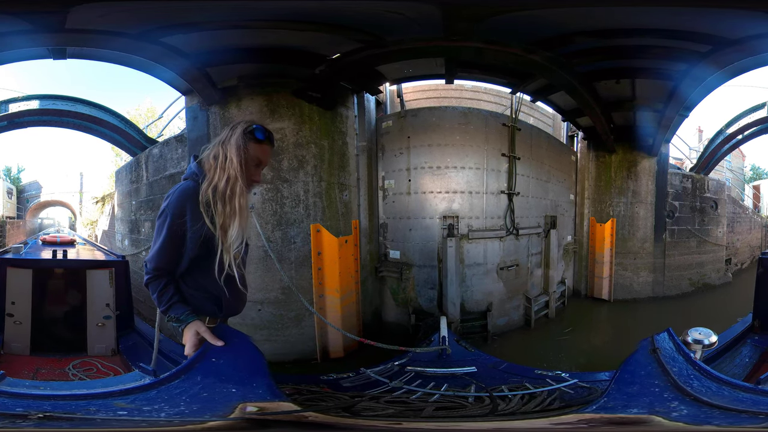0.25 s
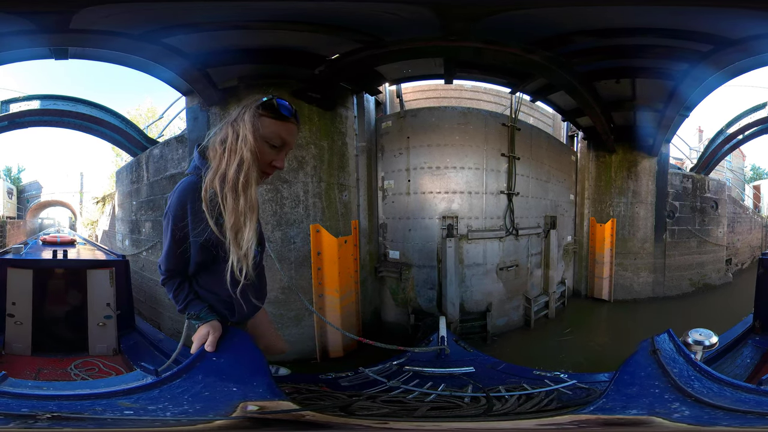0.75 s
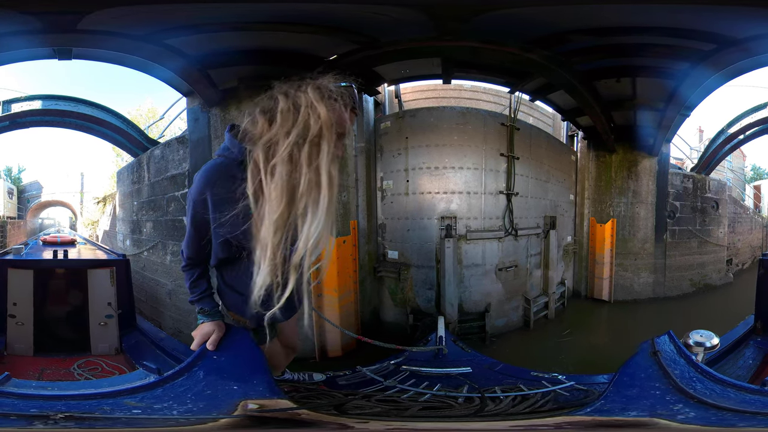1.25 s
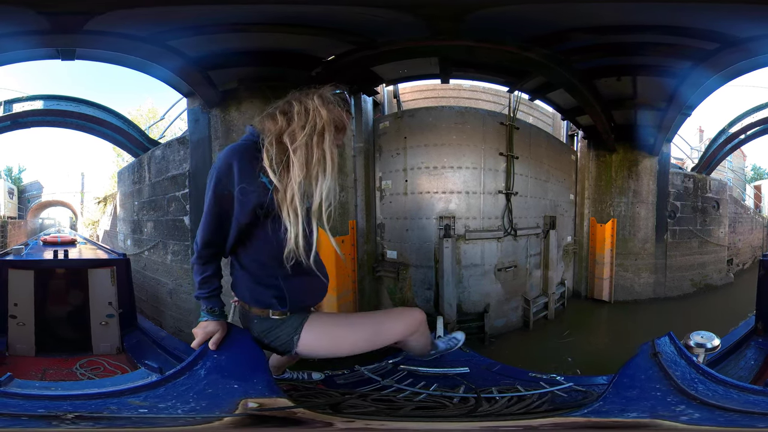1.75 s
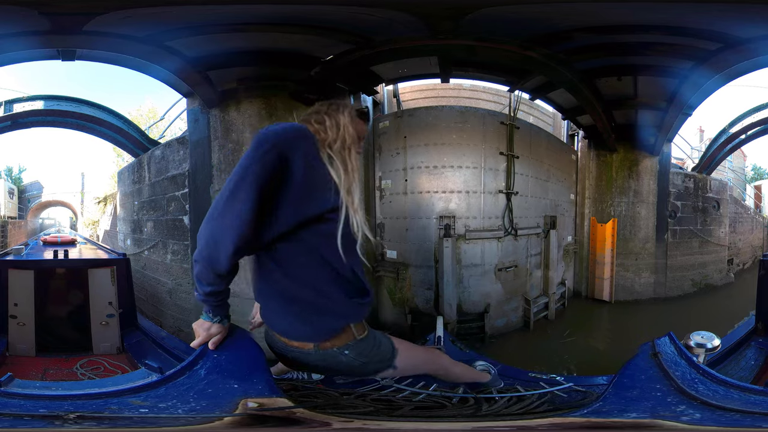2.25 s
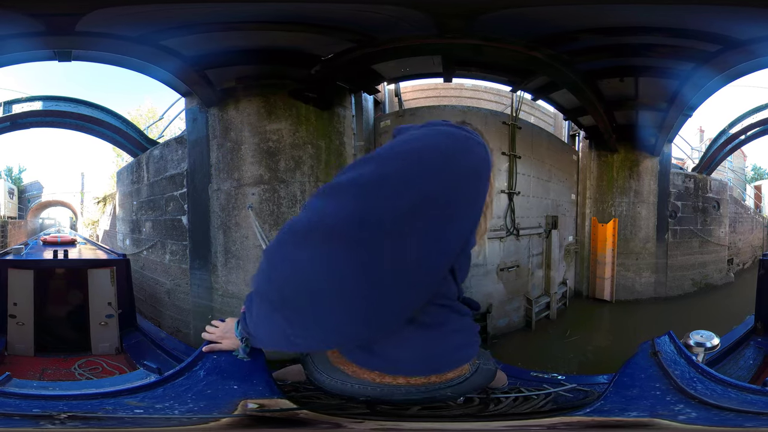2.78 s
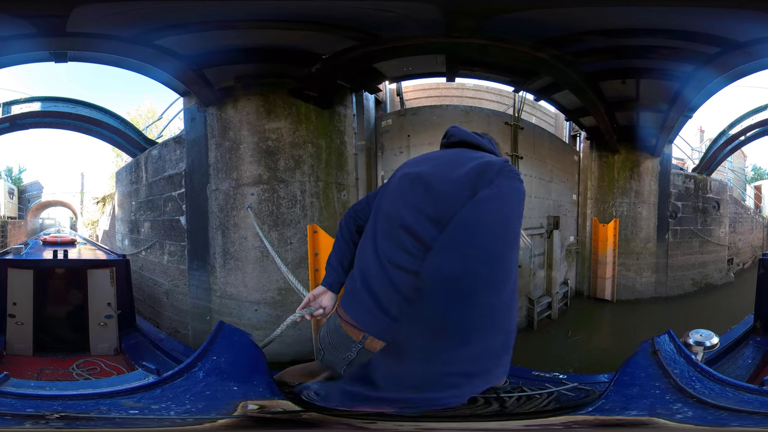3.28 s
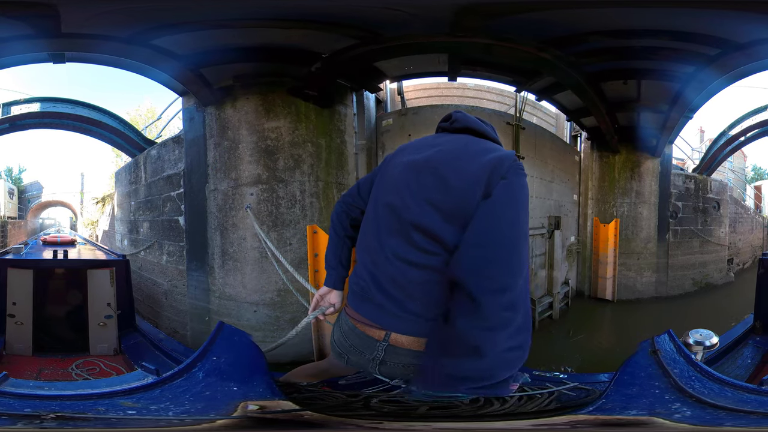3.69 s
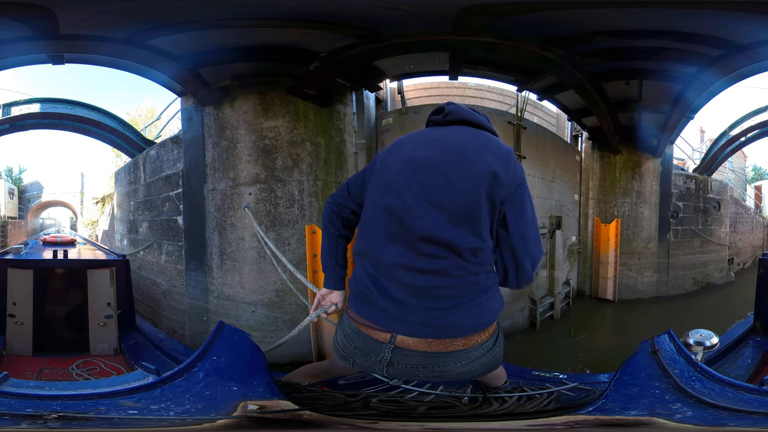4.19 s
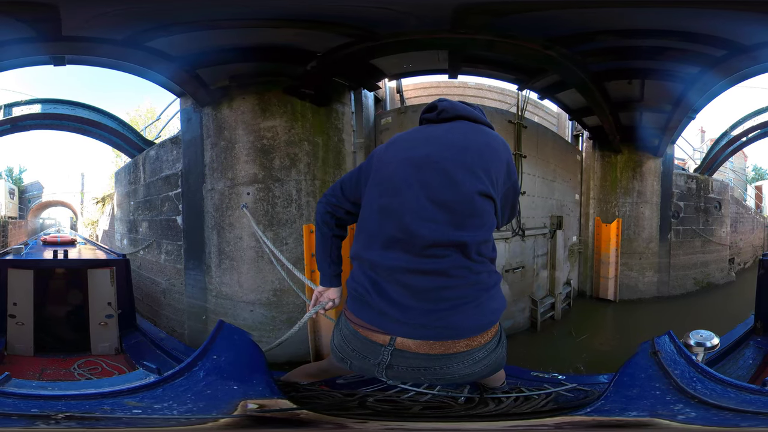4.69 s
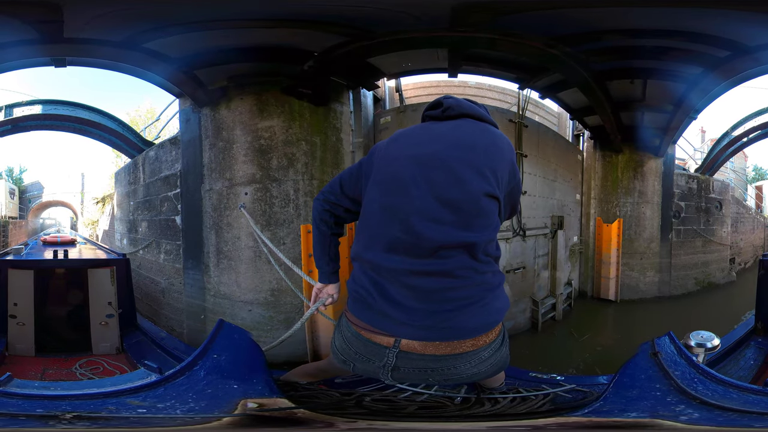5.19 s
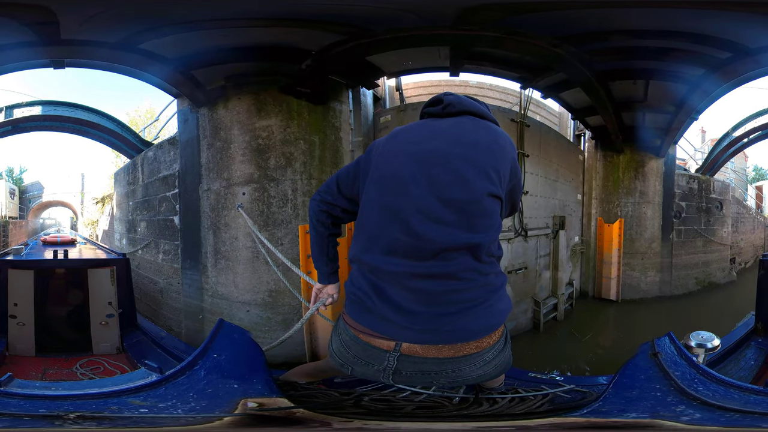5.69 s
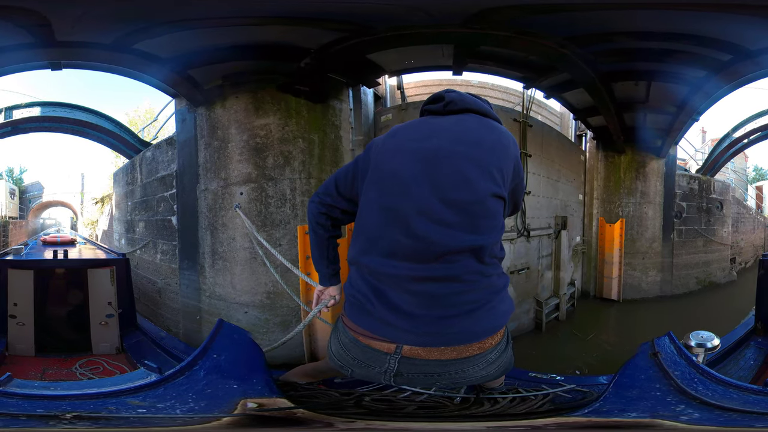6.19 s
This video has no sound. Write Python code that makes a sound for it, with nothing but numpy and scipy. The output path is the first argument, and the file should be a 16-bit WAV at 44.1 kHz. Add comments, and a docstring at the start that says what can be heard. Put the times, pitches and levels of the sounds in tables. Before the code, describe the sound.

Heard from the front of a boat in a canal lock, a diesel engine throbs steadily in the middle, with a droning hull and a soft rattle of metal. Faint trickling, hissing spray and small splashes spread to either side as water leaks through the gates. After about five seconds the chug slows and turns into a heavier, booming rumble while the water keeps gurgling.

```python
"""Narrowboat idling in a lock

A diesel idles in a canal lock under a bridge, heard from the bow. Strong and weak firings alternate
and ring the exhaust and the steel hull in a steady chug; near the end the engine takes load, slows
and makes the hull boom. Water gurgles, sprays, drips and splashes at the leaking gates."""
import sys
import numpy as np
from scipy import signal
from scipy.fft import rfft, irfft, next_fast_len
from scipy.io import wavfile
from scipy.ndimage import uniform_filter1d, map_coordinates

SR = 44100
rng = np.random.default_rng(int(sys.argv[2]) if len(sys.argv) > 2 else 0)


def dump_mix(stems):
    """Bounce the given channels to the path in sys.argv[1] as a 16-bit WAV at rate SR."""
    frames = np.atleast_2d(stems).T  # one column per channel
    limited = np.clip(frames, -1, 1)  # hard clip at full scale
    pcm = np.round(limited * 32767).astype(np.int16)
    wavfile.write(sys.argv[1], SR, pcm)


N = 284312


def amp(db):
    """Decibels to gain."""
    return 10 ** (np.asarray(db) / 20)


def unit(x):
    """Scale to rms 1."""
    return x / np.sqrt(np.mean(x ** 2) + 1e-20)


def along(points, hz):
    """An EQ curve read on a log frequency axis."""
    freqs, values = np.transpose(points)
    return np.interp(np.log(hz + 1), np.log(freqs + 1), values)


def curves(rows):
    """Automation: one value per sample for each column after the time."""
    times, *columns = np.transpose(rows)
    return [np.interp(np.arange(N) / SR, times, column) for column in columns]


def swell(crest_s, length_s, rise_db):
    """A smooth rise and fall in dB."""
    position = np.clip((np.arange(N) / SR - crest_s) / length_s, -.5, .5)
    return rise_db * np.cos(np.pi * position) ** 2


def wobble(rate_hz):
    """A smooth random curve with rate_hz knots a second."""
    knots = rng.standard_normal(int(N * rate_hz / SR) + 4)
    return map_coordinates(knots, [np.arange(N) * rate_hz / SR])


def filtered(x, response):
    """x through a complex frequency response."""
    size = next_fast_len(N + SR // 2)
    return irfft(rfft(x, size) * response(np.fft.rfftfreq(size, 1 / SR)), size)[..., :N]


def coloured(x, eq):
    """x through an EQ curve, at rms 1."""
    return unit(filtered(x, lambda hz: amp(along(eq, hz))))


def resonances(modes, hz):
    """The response of a bank of ringing modes."""
    return sum(amp(db) * 1j * hz * width / (pitch * pitch - hz * hz + 1j * hz * width)
               for pitch, width, db in modes)


def patchy(depth_db):
    """White noise with brief patches of random gain."""
    spectra = signal.stft(rng.standard_normal(N), nperseg=512)[2]
    patches = uniform_filter1d(rng.standard_normal(spectra.shape), size=12, axis=0)
    patches = uniform_filter1d(patches, size=7, axis=1)
    return unit(signal.istft(spectra * amp(depth_db * unit(patches)), nperseg=512)[1][:N])


def drops(count, centre_hz, scatter, cycles, size_db):
    """Drops and small bubbles: short damped rings whose pitch rises."""
    when, size = rng.random(count), rng.exponential(size=count)
    hz = np.clip(centre_hz * np.exp(scatter * rng.standard_normal((count, 1))), 500, 9000)
    samples = np.arange(400)
    age = hz * samples / SR / cycles
    envelope = amp(size_db * np.minimum(size, 3))[:, None] * np.exp(-3 * age)
    rings = envelope * np.sin(2 * np.pi * cycles * age * (1 + 0.069 * age))
    at = (when * N).astype(int)[:, None] + samples
    return unit(np.bincount(at.ravel(), rings.ravel(), N)[:N])


# Stereo width of the water: freq_hz, side_gain_db
WATER_WIDTH = [(2400, -58), (3000, -31.5), (3200, -4), (6000, -5.5), (6700, -27.5), (7300, -31)]
def spread(mid, side):
    """Only the spray's band is wide; the rest sits in the middle."""
    side = filtered(side, lambda hz: amp(along(WATER_WIDTH, hz)))
    return np.array([mid + side, mid - side])


# Tone of the drips: freq_hz, gain_db
TRICKLE_EQ = [(900, -18), (1500, -3.5), (2500, -4), (5500, 0), (7000, -2), (8000, -10), (9000, -35)]
def trickle(places=8, echo_db=2, t60_s=0.21):
    """Drips plink in several places, each with its own brief echo between the walls."""
    t, out = np.arange(SR // 4) / SR, np.zeros(N)
    for _ in range(places):
        drips = drops(count=130, centre_hz=3900, scatter=0.38, cycles=30, size_db=2.2)
        tail = amp(-60 * t / t60_s) * rng.standard_normal(len(t))
        out += drips + amp(echo_db) * signal.fftconvolve(drips, tail / np.linalg.norm(tail))[:N]
    return coloured(out, TRICKLE_EQ)


# Tone of the spray: freq_hz, gain_db
SPRAY_EQ = [(1500, -35), (2700, -5.5), (3400, -4), (4800, -1), (6200, -1.5), (7200, -4), (8000, -11.5),
            (8700, -19.5), (9400, -49)]
def spray():
    """A bright hiss flecked with tiny droplets."""
    hiss = patchy(depth_db=2.5)
    droplets = drops(count=6000, centre_hz=5160, scatter=0.3, cycles=8, size_db=0)
    return coloured(hiss + 0.17 * droplets, SPRAY_EQ)


# Tone of the gurgle: freq_hz, gain_db
GURGLE_EQ = [(400, -24), (900, 5), (1300, 4), (1600, 0.5), (2000, 0), (2800, 0), (3600, -7.5), (6000, -46)]
def gurgle():
    """Bubbles ring in a midrange wash of falling water."""
    wash = patchy(depth_db=2)
    bubbles = drops(count=3500, centre_hz=1903, scatter=0.454, cycles=22, size_db=-3)
    return coloured(wash + 0.19 * bubbles, GURGLE_EQ)


# Base flow of the leak: time_s, level_db
LEAK_FLOW = [(0, -51.5), (1.2, -52), (2.5, -54.5), (4.7, -57.5), (5.5, -55), (6.45, -57.5)]
# Surges on top of it: crest_s, length_s, gurgle_rise_db, spray_rise_db
LEAK_SURGES = [(0.017, 0.14, 3, 2), (0.98, 0.2, 3.5, 1.5), (1.702, 0.47, 2.5, 1.5), (1.974, 0.14, 5, 4.5),
               (2.183, 0.18, 4, 3.5), (2.61, 0.084, 6, 4.5), (3.023, 0.6, 3.5, -0.5),
               (3.372, 0.36, 2.5, -0.5), (3.718, 0.23, 3, 3.5), (4.076, 0.24, 5.5, 2.5),
               (4.474, 0.39, 2.5, 2.5), (4.99, 0.36, 3, 1.5), (5.217, 0.17, 3, 1.5), (5.377, 0.14, 3.5, 2),
               (5.558, 0.12, 5.5, 2.5), (5.983, 0.97, 9.5, 4), (6.39, 0.35, 4.5, 1.5)]
def gate_leak(gurgle_trim_db=1.1, spray_trim_db=0.8, drip_db=-3.5, spray_follows=0.88, flutter_db=1.13):
    """Water falls from the gates in surges: gurgle in the middle, wide spray and drips above it."""
    flow_db = curves(LEAK_FLOW)[0] + flutter_db * wobble(30)
    gurgle_db = flow_db + sum(swell(s, length, rise) for s, length, rise, _ in LEAK_SURGES)
    spray_db = flow_db.mean() + spray_follows * (flow_db - flow_db.mean())
    spray_db += sum(swell(s, length, rise) for s, length, _, rise in LEAK_SURGES)
    body = gurgle()
    sparkle = spread(spray(), spray()) + amp(drip_db) * spread(trickle(), trickle())
    return amp(gurgle_db + gurgle_trim_db) * body + amp(spray_db + spray_trim_db) * sparkle


# Single slaps of water: start_s, pitch_hz, level_db, attack_s
SPLASH_HITS = [(0.064, 5870, -50.5, 0.0079), (0.212, 1900, -48.5, 0.021), (0.299, 4500, -44.5, 0.0068),
               (0.354, 1620, -46, 0.013), (0.498, 3430, -50, 0.017), (0.721, 5200, -47.5, 0.016),
               (1.151, 2970, -51.5, 0.018), (1.563, 5170, -44.5, 0.014), (1.647, 4900, -45, 0.014),
               (1.92, 3750, -48, 0.0082), (1.984, 3350, -54, 0.0083), (2.12, 3680, -47.5, 0.015),
               (2.599, 5560, -50, 0.009), (2.802, 2380, -48.5, 0.014), (2.959, 2820, -52, 0.021),
               (3.032, 2300, -49, 0.022), (3.05, 5900, -53.5, 0.016), (3.357, 3500, -45.5, 0.011),
               (3.655, 5560, -51, 0.018), (3.717, 5050, -47.5, 0.012), (4.199, 3900, -51, 0.0091),
               (4.43, 2870, -52, 0.015), (4.839, 5540, -54.5, 0.014), (5.341, 5900, -52, 0.011),
               (5.395, 4770, -50, 0.019), (5.546, 5900, -49.5, 0.0065), (5.825, 4600, -47, 0.0076),
               (5.88, 3000, -55, 0.018), (5.975, 5600, -47.5, 0.011), (6.025, 4600, -50.5, 0.017)]
def splashes(trim_db=-0.5, half_width_oct=0.41, sputter_db=2):
    """Each slap is a short, uneven cloud of like-sized bubbles that dies away between the walls."""
    t, out = np.arange(SR // 4) / SR, np.zeros((2, N + SR))
    hz = np.fft.rfftfreq(len(t), 1 / SR)
    passband = (hz > 600) / (1 + (hz / 7500) ** 20)
    for start_s, pitch_hz, level_db, attack_s in SPLASH_HITS:
        band = passband / (1 + (np.log2((hz + 1) / pitch_hz) / half_width_oct) ** 2)
        cloud = unit(irfft(rfft(rng.standard_normal((2, len(t)))) * band, len(t)))
        envelope = t / attack_s * np.exp(1 - t / attack_s)
        out[:, round(start_s * SR):][:, :len(t)] += amp(level_db + trim_db) * cloud * envelope
    return spread(*out[:, :N] * amp(sputter_db * wobble(180)))


# Engine speed: time_s, firing_rate_hz
ENGINE_SPEED = [(0, 30.14), (1.6, 30.14), (2.3, 30.34), (5.15, 30.34), (5.3, 27.4), (5.55, 25.1),
                (6.1, 25.7), (6.45, 23.3)]
def loaded(idle_db, load_db, idle_hz=30.2, load_hz=26.7):
    """A level that slides from its idling to its loaded value as the engine slows."""
    load = np.clip((idle_hz - curves(ENGINE_SPEED)[0]) / (idle_hz - load_hz), 0, 1)
    return idle_db + load * (load_db - idle_db)


# Tone of the churn: freq_hz, gain_db
CHURN_EQ = [(22, -30), (42, 12.5), (90, 4.5), (125, -12), (200, -45), (600, -120)]
def churn(lumpy_db=2.5):
    """A lumpy low rumble that rises under load, as of the propeller biting the water."""
    lumps = amp(lumpy_db * wobble(14))
    rumble = coloured(rng.standard_normal(N), CHURN_EQ)
    return amp(loaded(idle_db=-55, load_db=-36)) * unit(lumps * rumble)


# Modes of the hollow ring: pitch_hz, width_hz, gain_db
HOLLOW_MODES = [(530, 14, -3), (597.5, 9, 1.5), (646, 7, 3), (733, 22, -0.5), (788, 14, -6)]
# Its swells: crest_s, length_s, rise_db
RING_SWELLS = [(0.1, 0.59, 8), (1.58, 1.15, 12.5), (2.916, 0.3, 12.5), (6.1, 0.95, 11.5)]
def hollow_ring(rest_db=-56.5):
    """Noise through narrow modes: a hollow note that swells and fades in the clatter."""
    response = lambda hz: resonances(HOLLOW_MODES, hz) * (hz > 450) / (1 + (hz / 850) ** 12)
    ring = unit(filtered(rng.standard_normal(N), response))
    return amp(rest_db + sum(swell(*row) for row in RING_SWELLS)) * ring


# Tone of the clatter: freq_hz, gain_db
CLATTER_EQ = [(200, -23.5), (350, -8), (410, -1.5), (465, 4), (560, -1.5), (700, -3), (900, -9.5),
              (1300, -16.5), (2000, -22.5), (5000, -50.5)]
def clatter(firings, pulse_depth=0.085, fade_db_per_s=0.28):
    """Mechanical noise of the engine, washed out by the walls."""
    pulsing = 1 + pulse_depth * np.cos(2 * np.pi * firings)
    level_db = loaded(idle_db=-41.5, load_db=-43.5) - fade_db_per_s * np.arange(N) / SR
    return amp(level_db) * coloured(pulsing * patchy(depth_db=1.5), CLATTER_EQ)


# The hull crests after the strong firing, the plates a little later; both lags count firings.
HULL_LAG, PLATES_LAG = 1.06, 1.32
def chugging_noise(firings, lag, accent_db):
    """Noise shaped once per pair of firings; a negative accent dips it at the lag."""
    pulse = np.cos(np.pi * (firings - lag) / 2) ** 8
    return amp(accent_db * pulse) * rng.standard_normal(N)


# Tone of the plates: freq_hz, gain_db
PLATES_EQ = [(150, -31.5), (225, 1.5), (255, 6), (310, 3), (365, 1), (410, -8.5), (600, -64)]
# Their fader ride: time_s, level_db
PLATES_RIDE = [(0, -44), (0.25, -38), (0.85, -42.5), (1.25, -39), (1.7, -42), (2.2, -41), (3.05, -39),
               (3.45, -38.5), (3.95, -39), (4.6, -43.5), (5.0, -39), (5.65, -40.5), (6.0, -43),
               (6.3, -39.5)]
def plates(firings):
    """Steel plates rattle in time with the chug."""
    rattle = coloured(chugging_noise(firings, PLATES_LAG, accent_db=-2.5), PLATES_EQ)
    return amp(curves(PLATES_RIDE)[0]) * rattle


# Exhaust and hull modes: pitch_hz, width_hz, gain_db
HULL_MODES = [(104.9, 6.5, 11), (148.4, 2.9, -6), (175.5, 14, -5), (277.2, 2.1, -3.5), (316, 19, -34.5),
              (315, 16, -33), (456, 8.1, -31.5)]
# Tone of the exhaust rumble: freq_hz, gain_db
RUMBLE_EQ = [(20, -29.5), (45, -6), (70, -7.5), (98, -9.5), (120, -1), (165, -1), (192, -4.5), (222, -18),
             (300, -27), (800, -79)]
# How hard the engine chugs, here and in the drone: time_s, gain_db
CHUG_RIDE = [(0, -10.5), (0.3, -5.5), (0.7, -4), (1.1, -5.5), (1.8, -1), (2.45, -0.5), (2.8, -2),
             (3.15, -3.5), (3.6, -2), (4.1, 0.5), (4.6, 1), (5.0, -2.5), (5.25, -1), (5.55, 2), (5.9, -15),
             (6.2, 2), (6.45, 1)]
def exhaust(firings, ring_db=-18, rumble_db=-4.5, chug_follow=0.2):
    """No two puffs are alike: their differences ring the hull, and the walls smear them to a rumble."""
    at = np.flatnonzero(np.diff(np.floor(firings - HULL_LAG)))
    puffs = np.bincount(at, rng.uniform(-1, 1, len(at)), N)
    silencer = lambda hz: hz ** 4 / (hz ** 4 + 90 ** 4) / (1 + (hz / 650) ** 4)
    ring = unit(filtered(puffs, lambda hz: resonances(HULL_MODES, hz) * silencer(hz)))
    rumble = coloured(chugging_noise(firings, HULL_LAG, accent_db=-3.5), RUMBLE_EQ)
    level_db = loaded(idle_db=-25, load_db=-26) + chug_follow * curves(CHUG_RIDE)[0]
    return amp(level_db) * (amp(ring_db) * ring + amp(rumble_db) * rumble)


# Drone partials, with half orders from the unequal cylinders and one stray tone:
# firing_rate_multiple, idle_db, load_db
DRONE_ORDERS = [(1.5, -38.8, -54.0), (2.5, -48.0, -47.0), (3.5, -47.5, -41.0), (3.73, -40.0, -52.0),
                (4, -35.5, -46.0), (4.5, -40.0, -40.0), (5, -33.3, -33.5), (5.5, -37.0, -37.5),
                (6, -35.0, -44.0), (6.5, -45.5, -49.5), (7, -53.5, -48.0), (8, -54.0, -55.0),
                (8.5, -48.0, -62.0), (9, -44.0, -61.5), (9.5, -51.0, -57.0), (10, -57.5, -58.0),
                (10.5, -52.5, -60.0), (12, -53.0, -62.0)]
# The fifth order's hum swells and sinks: time_s, gain_db
HUM_RIDE = [(0, -12), (0.3, -1.5), (0.65, 4), (1.0, -0.5), (1.5, 1), (2.0, -0.5), (2.6, 2), (2.85, 1),
            (3.1, -4), (3.35, 1.5), (4.05, -8), (4.55, -3), (4.85, 2), (5.15, -6), (5.45, -11), (5.68, -2),
            (5.92, 2), (6.25, -7)]
def hull_drone(firings, hum_db=1, hum_follow=0.091, chug_trim_db=-0.24, waver_db=1.3, drift_rad=0.44):
    """The repeating part of the hull's ring: its orders crest in one chug per pair of firings."""
    chug_db = curves(CHUG_RIDE)[0]
    tone = np.zeros(N)
    for order, idle_db, load_db in DRONE_ORDERS:
        level_db = loaded(idle_db, load_db)
        if order == 5:
            level_db += hum_db + curves(HUM_RIDE)[0]
        elif order % 2 == 1:  # the other odd orders hum more evenly
            level_db += hum_db + loaded(hum_follow * chug_db, 0) + waver_db * wobble(2.3)
        elif order > 3:  # above the throb, the rest come and go with the chug
            level_db += chug_trim_db + chug_db + waver_db * wobble(3.09)
        lag = PLATES_LAG if order >= 8 else HULL_LAG
        phase = 2 * np.pi * order * (firings - lag) + drift_rad * wobble(1.937)
        tone += amp(level_db) * np.cos(phase)
    return np.sqrt(2) * tone


# The low end, whose second order booms under load: time_s, first_db, second_db, third_db
THROB_RIDE = [(0, -28.3, -36, -32.5), (0.45, -28.3, -43, -33), (0.9, -29.5, -41, -34.5),
              (1.6, -29.7, -45, -34), (2.2, -31, -50, -31.5), (2.55, -31.5, -45, -34),
              (2.9, -30.2, -44, -30.7), (3.3, -29.7, -43, -35), (3.6, -29.5, -42, -34.5),
              (4.2, -30.3, -43, -40), (5.15, -29.7, -45, -42), (5.33, -29.3, -28, -46),
              (5.68, -32, -28.5, -40), (5.85, -31.5, -26.3, -41), (6.12, -31, -26.3, -40),
              (6.24, -32, -33, -44), (6.36, -40, -26.7, -50), (6.45, -46, -25.7, -48)]
def throb(firings, lag=0.323):
    """The engine's slow pressure waves: the first three orders of the firing rate."""
    phase = 2 * np.pi * (firings - lag)
    return np.sqrt(2) * sum(amp(db) * np.cos(order * phase)
                            for order, db in enumerate(curves(THROB_RIDE), 1))


def scene():
    """The engine in the middle, the water around it."""
    firings = np.cumsum(curves(ENGINE_SPEED)[0]) / SR
    chug = throb(firings) + hull_drone(firings) + exhaust(firings) + plates(firings)
    engine = chug + churn() + clatter(firings) + hollow_ring()
    return engine + gate_leak() + splashes()


def record(dry, top_hz=9400):
    """A brick-wall high cut on the mix."""
    return filtered(dry, lambda hz: hz < top_hz)


dry = scene()
out = record(dry)
dump_mix(out)
```